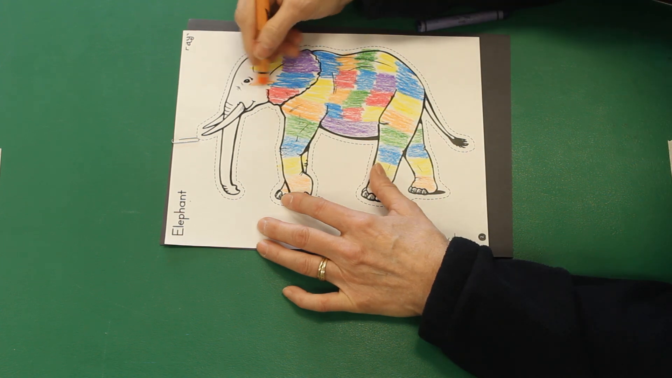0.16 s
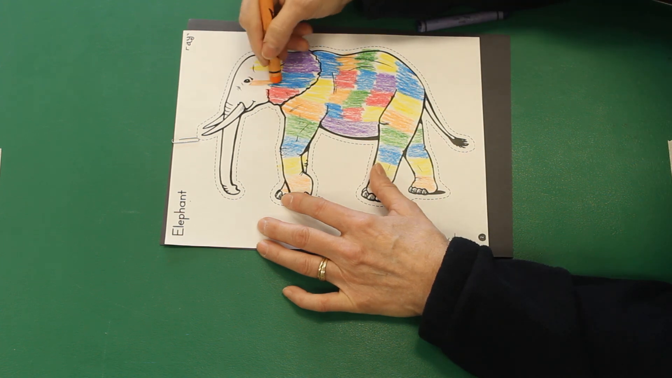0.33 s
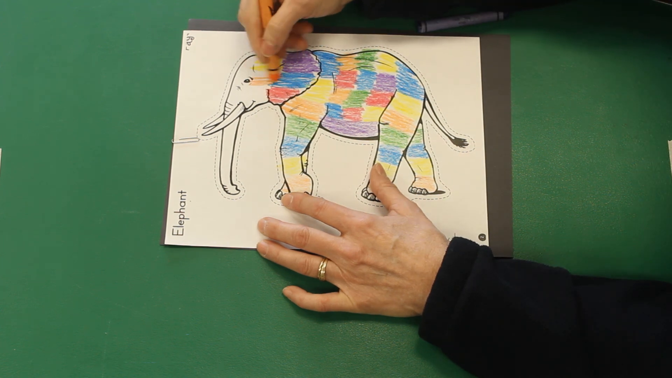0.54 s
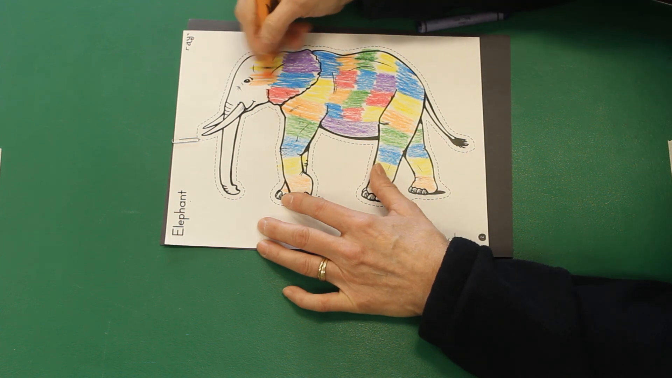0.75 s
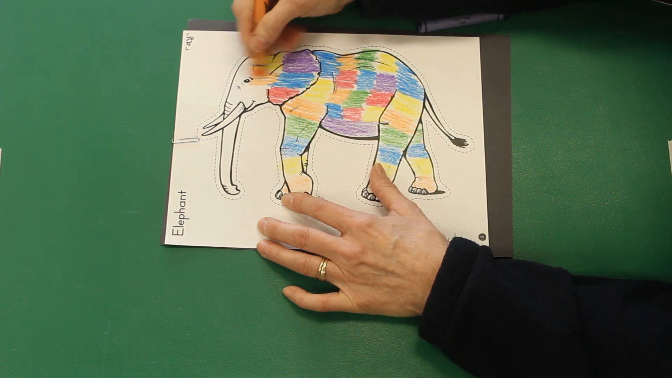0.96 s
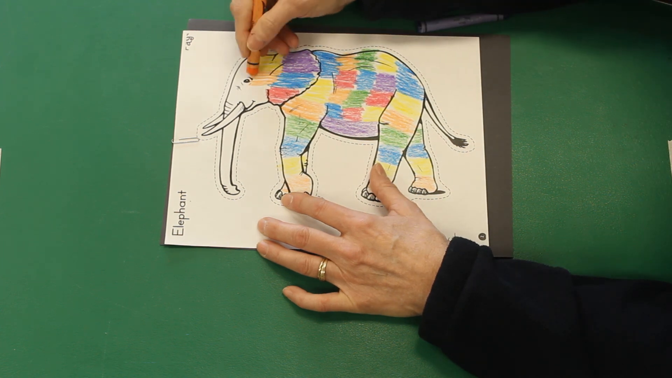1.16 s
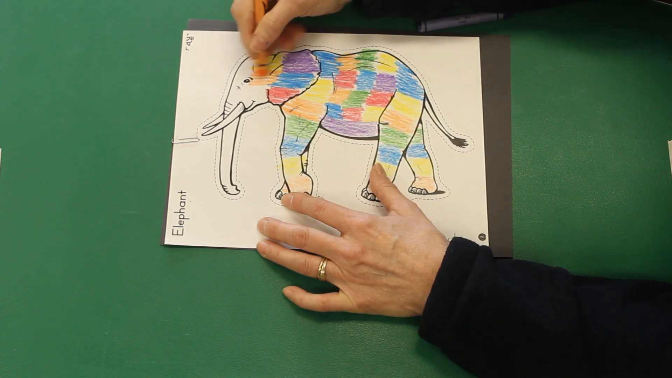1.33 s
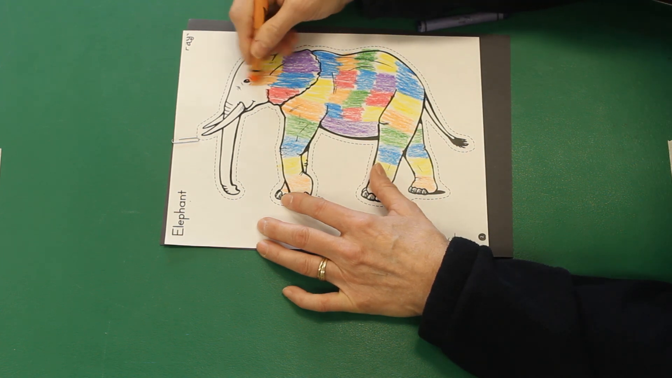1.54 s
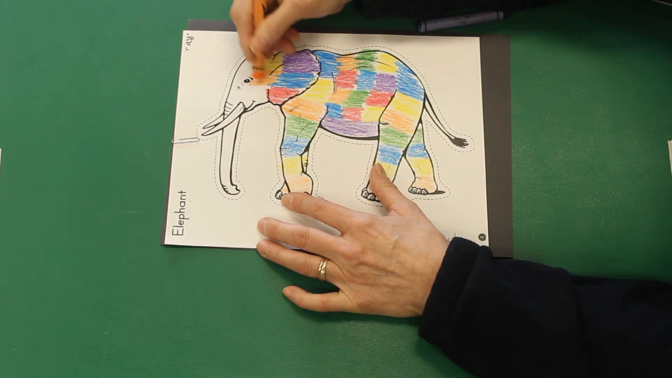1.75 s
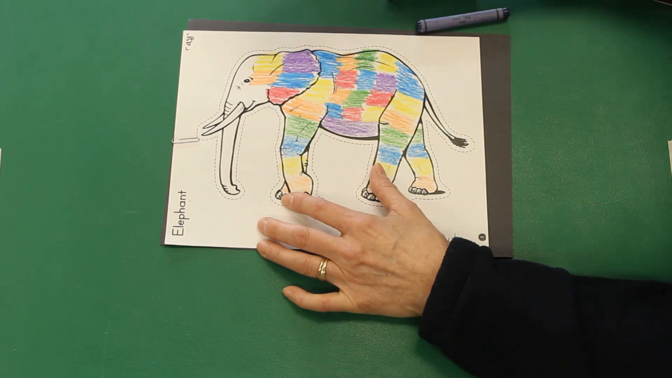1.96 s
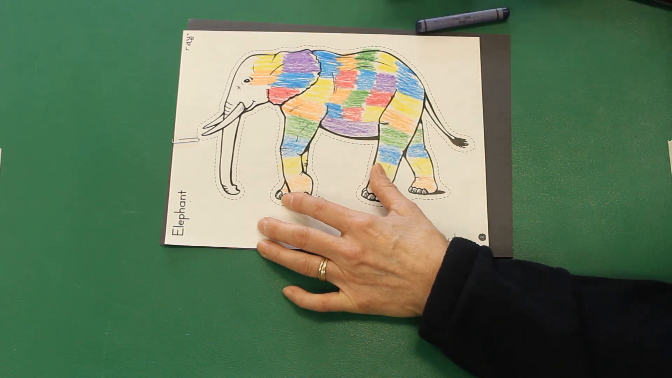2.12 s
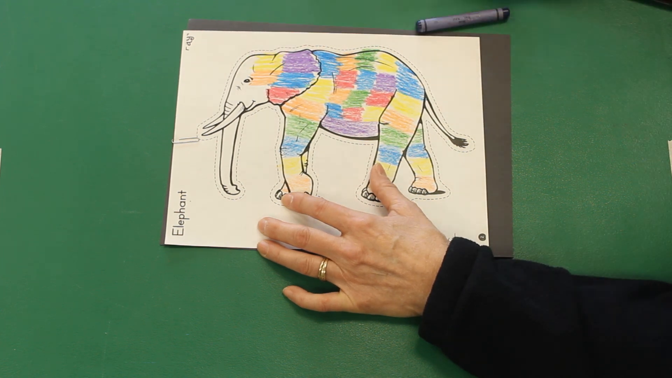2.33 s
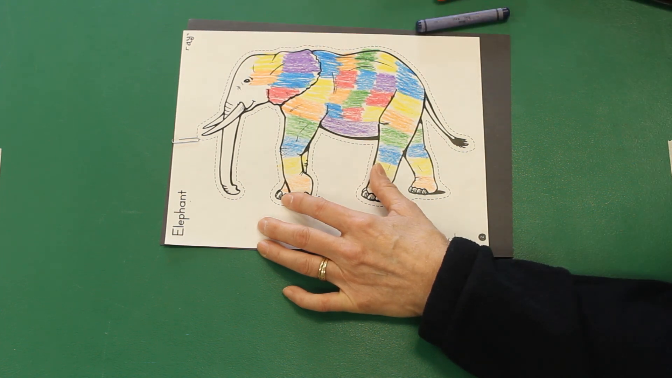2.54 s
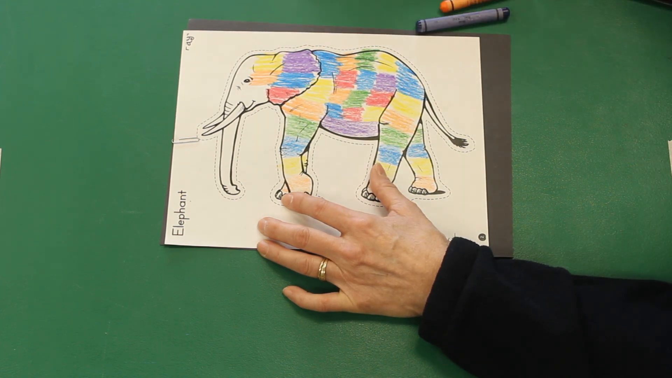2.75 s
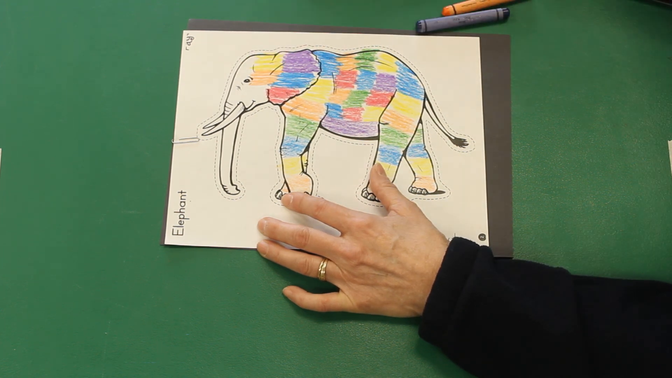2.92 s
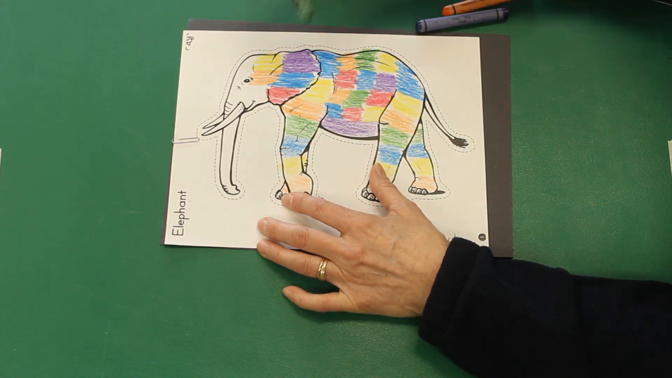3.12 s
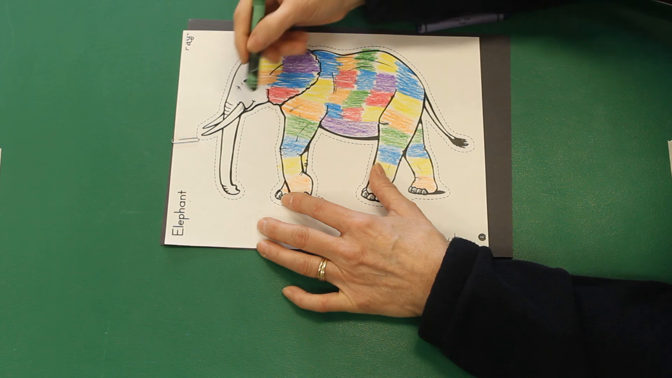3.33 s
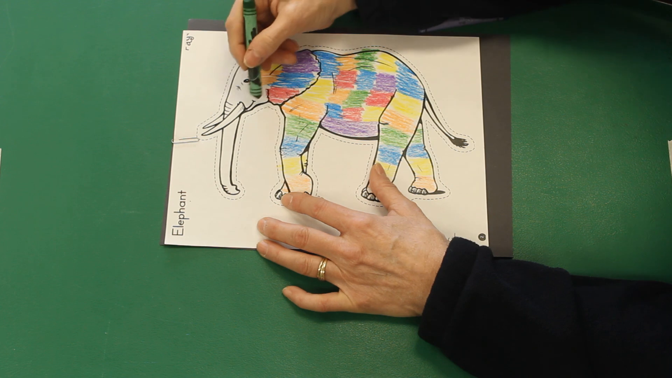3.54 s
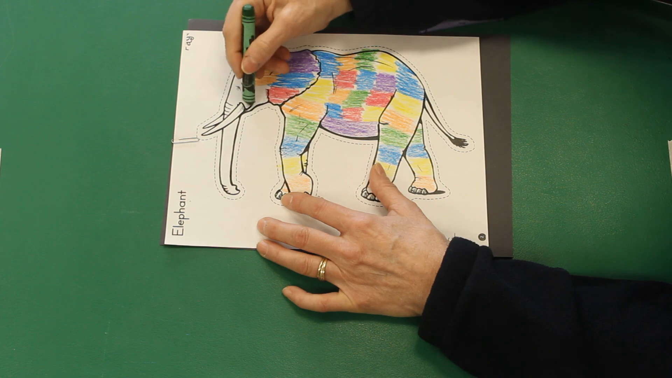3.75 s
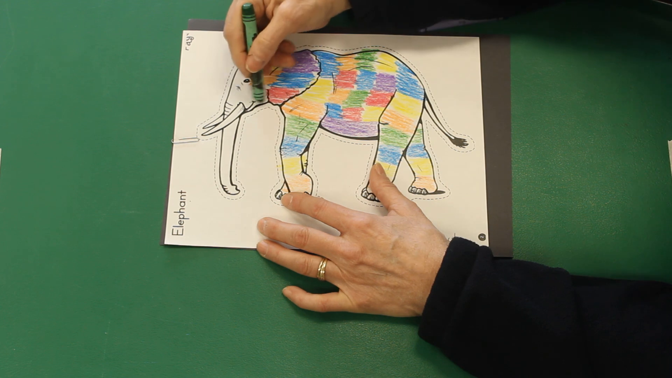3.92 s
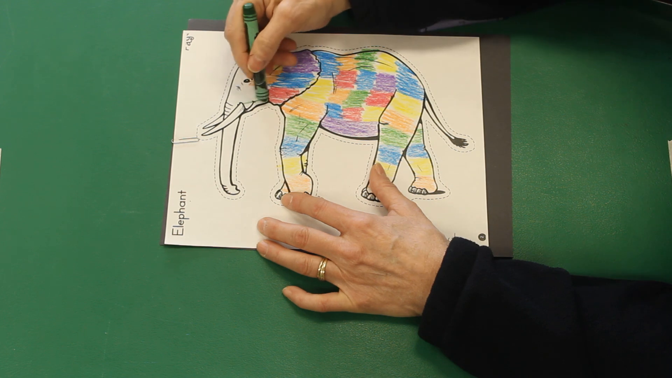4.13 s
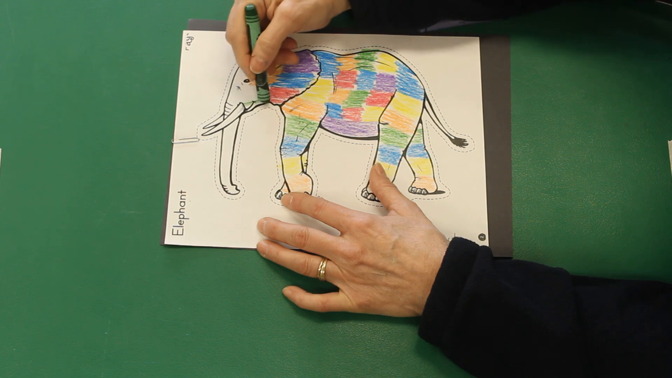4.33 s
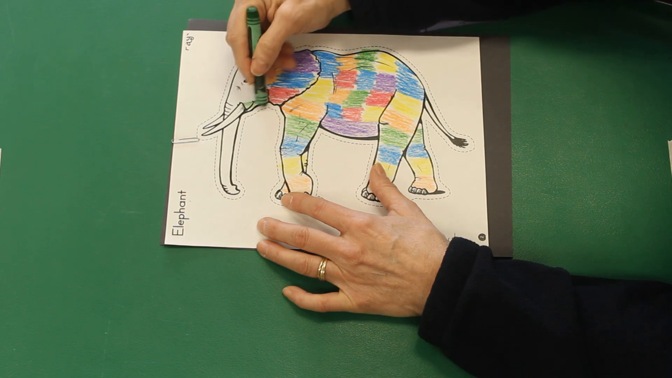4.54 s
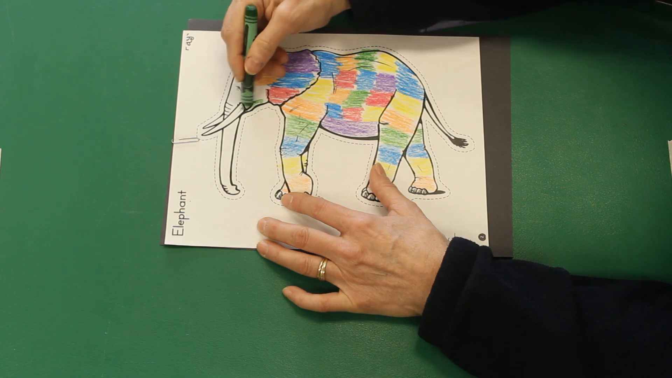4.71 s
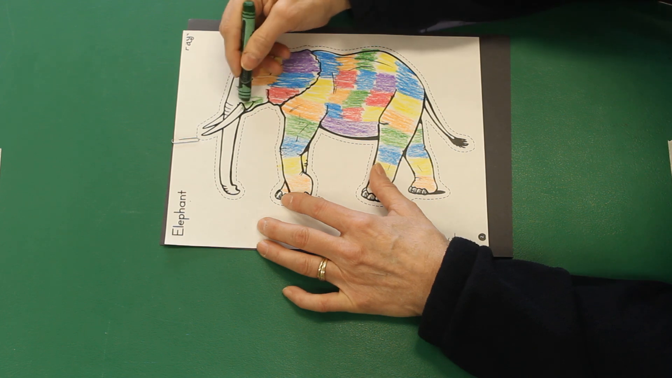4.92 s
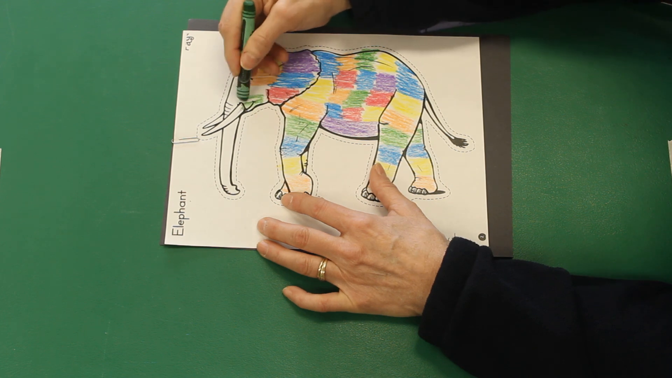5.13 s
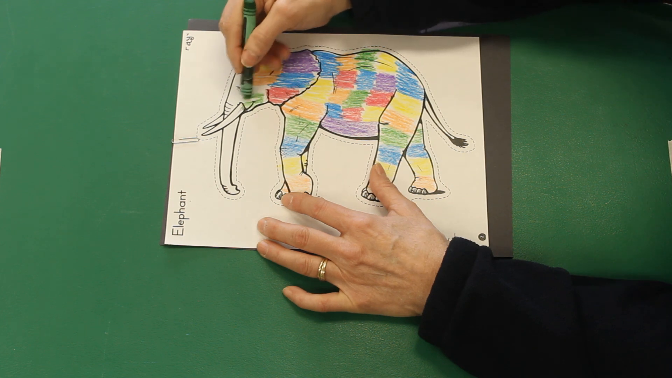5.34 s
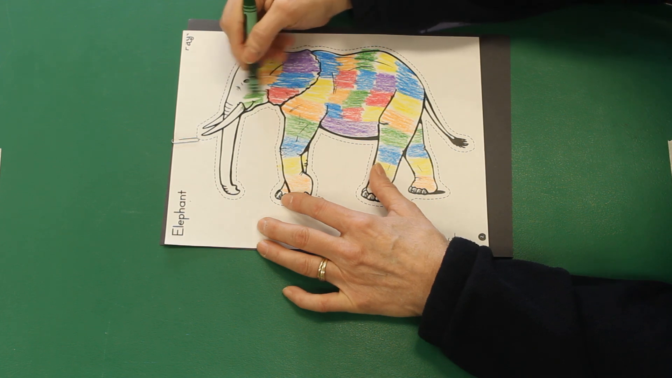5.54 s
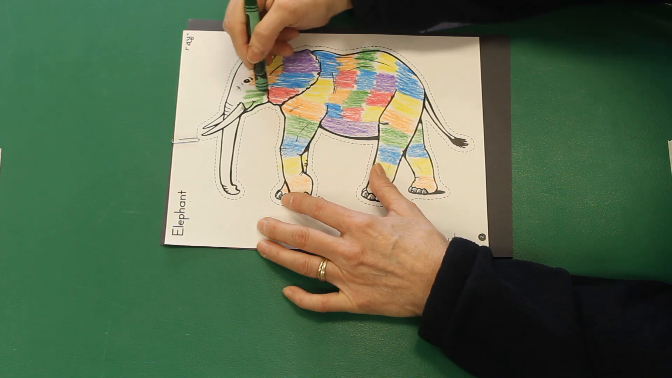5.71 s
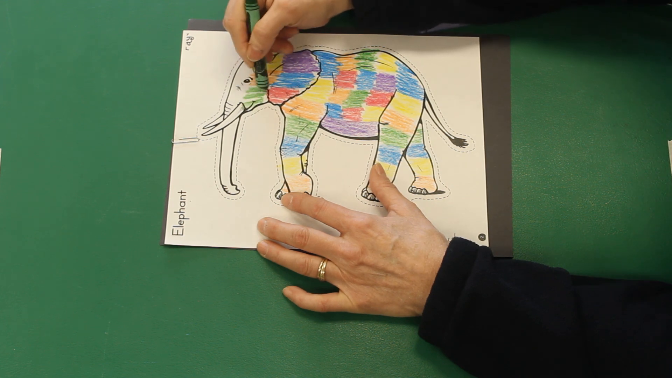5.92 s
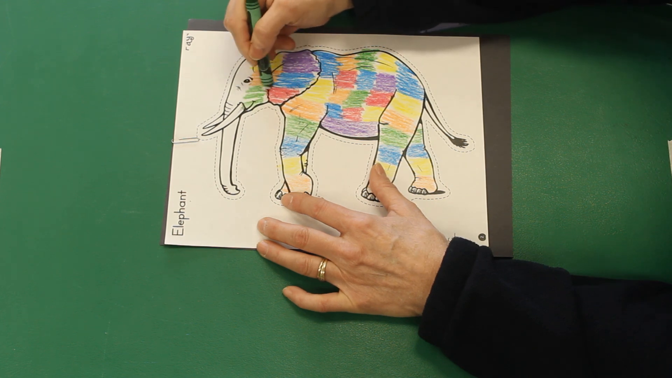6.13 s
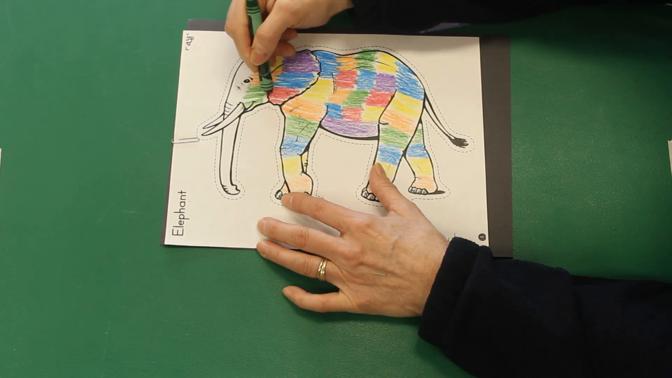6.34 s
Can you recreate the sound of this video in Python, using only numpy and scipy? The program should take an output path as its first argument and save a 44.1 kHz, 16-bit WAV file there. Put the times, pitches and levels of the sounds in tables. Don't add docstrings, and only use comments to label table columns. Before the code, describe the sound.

A close, quiet indoor recording at a hollow tabletop, with faint steady camera hiss throughout. From 0 to 1.8 s a wax crayon scribbles on paper in rapid back-and-forth strokes, roughly nine a second, uneven in pressure: a soft, dry, slightly raspy rub with a woody resonance, small stick-slip jolts and low hand bumps, the hardest near 0.6 s. Then a brief pause. At about 2.3 s the crayon is let go, with a knock at 2.38 and a much louder tight burst of hard clacks from 2.47 to 2.52, ringing briefly in the table. A weaker rattling roll at 2.75 to 2.9 dies away. Hiss and faint table movement fill the gap until 3.75 s, when a second crayon starts scribbling, duller and less raspy. A bright tiny wax snap ticks at 5.3 s. Strokes lighten after 5.7 s, with soft low bumps, continuing to the end at about 6.4 s.

```python
import sys
import numpy as np
from scipy import signal
from scipy.fft import rfft, irfft
from scipy.io import wavfile

SR = 44100
rng = np.random.default_rng(int(sys.argv[2]) if len(sys.argv) > 2 else 0)


def voltage_ratio(level):
    return 10 ** (np.asarray(level, float) / 20)


def digitize_waveform(pressure):
    field = np.atleast_2d(pressure).T
    bounded = np.clip(field, -1, 1)
    quanta = np.round(bounded * 32767).astype(np.int16)
    wavfile.write(sys.argv[1], SR, quanta)


N = 280917

# start t/s, length/s, pressure level/dB, wrist push level/dB
FIRST_STROKES = [(0.0, 0.087, -60, -60), (0.102, 0.096, -54, -60), (0.19, 0.12, -61.5, -60),
                 (0.338, 0.094, -53, -58), (0.415, 0.13, -59, -62), (0.56, 0.11, -57, -56),
                 (0.661, 0.115, -62.5, -57.5), (0.794, 0.083, -55, -55.5), (0.875, 0.13, -60, -58),
                 (1.025, 0.093, -52.5, -56), (1.115, 0.12, -64, -54.5), (1.261, 0.092, -60.5, -53),
                 (1.379, 0.1, -60.5, -57.5), (1.476, 0.076, -64.5, -60), (1.551, 0.11, -68, -64),
                 (1.664, 0.081, -58.5, -59), (1.757, 0.057, -73.5, -60)]
SECOND_STROKES = [(3.751, 0.037, -70, -71), (3.858, 0.07, -63.5, -59.5), (4.004, 0.073, -57.5, -62.5),
                  (4.083, 0.11, -60.5, -59.5), (4.24, 0.079, -55, -60), (4.323, 0.12, -59, -64.5),
                  (4.488, 0.061, -56.5, -63.5), (4.573, 0.084, -57, -63.5), (4.69, 0.085, -69.5, -62),
                  (4.785, 0.11, -65, -63), (4.916, 0.071, -60, -59.5), (4.997, 0.11, -62.5, -57),
                  (5.158, 0.048, -55.5, -56), (5.219, 0.11, -64, -59.5), (5.361, 0.099, -67, -58.5),
                  (5.456, 0.12, -61.5, -56.5), (5.568, 0.1, -60.5, -58.5), (5.688, 0.08, -67.5, -63),
                  (5.806, 0.067, -68, -66.5), (5.887, 0.1, -73.5, -66), (6.019, 0.06, -77, -66),
                  (6.089, 0.15, -74.5, -61.5), (6.218, 0.17, -62.5, -63.5)]
# place of top speed/0-1, surface level/dB, paper level/dB
STROKE_HABITS = [
    [(0.83, -68, -70.5), (0.23, -70, -71)],
    [(.55, -70, -86.5), (0.08, -69, -82)],
]
USUAL_PRESSURE_DB = -60
SURFACE_DB_PER_DB, PAPER_DB_PER_DB = 0.66, 0.03
# t/s, body peak level/dB, surface level/dB
TIP_JOLTS = [(0.349, -50, -58), (0.579, -39, -75), (0.811, -40, -78), (1.036, -37, -68), (3.764, -38, -80),
             (4.027, -53, -64), (4.527, -46.5, -64.5), (4.591, -53, -57), (5.172, -39, -71),
             (6.309, -43, -62.5), (2.321, -44.5, -66)]
# t/s, level/dB
RASP = [(0.0, -1.5), (0.7, 1.5), (1.05, 2.5), (1.3, -1), (1.5, 0.5), (1.8, -3), (4.3, 0), (5.3, 2),
        (6.37, 0)]
PUSH_TOPS = (0.39, 0.48)
PUSH_STRETCH, PUSH_LEAD_S = 1.41, 0.016
# start t/s, length/s, place of top/0-1, level/dB
SHOVES = [
    (1.868, 0.096, 0.43, -75),
    (2.315, 0.126, .55, -58.5),
    (2.469, 0.19, .28, -56.5),
    (2.732, 0.29, 0.31, -61),
    (3.272, 0.14, 0.66, -72),
    (3.591, .11, .4, -77),
]
# t/s, peak level/dB
BUMPS = [
    (0.613, -37.5),
    (0.838, -68),
    (1.071, -48),
    (1.297, -45),
    (5.048, -45.5),
    (5.271, -46),
    (5.508, -45),
    (6.12, -42.5),
]
# f/Hz, width/Hz, level/dB
ROCKING_MODES = [(43, 7, -7.5), (64.8, 23, -18.5), (91.5, 22, 3), (122, 55, -1.5), (159.3, 22, 1.5),
                 (182.4, 5, -1.5)]
BODY_MODES = [(227.6, 8.4, 0), (279.4, 22, -6.5), (385.2, 22.2, -3.5), (437, 34, -7.5), (509, 65, -13)]
SURFACE_MODES = [(638.5, 21, 7.5), (777, 32, 1), (860, 48, 0), (1003, 26, -1.5), (1065, 27, 4.5),
                 (1217, 50, 2.5), (1326, 38, -0.5), (1930, 740, -19.5)]
PAPER_MODES = [(2140, 500, 0), (3850, 370, 2.5), (4720, 650, 1), (6400, 2000, -7), (9300, 2800, -8.5)]
SNAP_MODES = [(4300, 1350, 0), (7300, 1300, -2.5), (8900, 1100, -5)]
# f/Hz, level/dB per Hz
HISS_MID = [(15, -49), (25, -17), (65, 5), (120, -4.5), (190, -3), (320, -8), (415, -9.5), (545, -9.5),
            (1100, -14), (3000, -17), (8000, -19.5), (14000, -19)]
HISS_SIDE = [(15, -35.5), (25, 2), (112, -8.5), (530, -9), (1500, -10.5), (8000, -10.5), (14000, -9.5)]
HISS_MID_DB, HISS_SIDE_DB, HISS_TOP_HZ = -68.5, -73, 14260
# t/s, peak level/dB
SNAPS = [
    (0.1365, -45),
    (0.9794, -57),
    (1.5489, -51),
    (4.81, -51),
    (5.2604, -55),
    (5.2899, -33.5),
    (5.3044, -52.5),
    (5.4784, -51),
]
# t/s, peak level/dB, crack level/dB, tick level/dB, share of ring time
KNOCKS = [(2.321, -52.5, -74, -75.5, 1.1), (2.376, -19, -36, -53, 1.24), (2.467, -11.5, -28, -30.5, 0.86),
          (2.479, -10, -22, -18.5, 1.41), (2.487, -29, -42, -53, 1), (2.492, -22, -36.5, -39, 0.61),
          (2.5, -27, -50, -38, 0.92), (2.516, -19.5, -37.5, -50, 1.55), (2.747, -30.5, -51, -85, 0.97),
          (2.797, -31, -48.5, -51, 1.8), (2.827, -30.5, -46.5, -66, 0.84), (2.832, -37.5, -58, -80, 1.1),
          (2.839, -38.5, -65, -60, 0.76), (2.868, -44.5, -73, -70, 1.1), (2.895, -51, -79, -73, 2.1),
          (2.978, -64, -84, -77, 1.7)]
# f/Hz, level/dB, t60/s
RING_MODES = [(172.3, -9, 0.25), (225.7, -13.5, 0.2), (412.3, -1.5, 0.24), (434, -7.5, 0.17),
              (514.5, 6, 0.12), (631, -5, 0.2), (770, -8.5, .2), (810, -5, 0.16), (963, -6.5, 0.14),
              (1008, -5, .16), (1163, 6.5, 0.13), (1290, -6.5, 0.19), (1438, -9, 0.099), (1745, 0.5, 0.13),
              (2790, -4, .15), (3270, -16, 0.206), (3480, -10.5, 0.19), (3870, -9, 0.14)]
# f/Hz, level/dB per Hz
CLATTER = [(90, -35), (175, -5), (260, -17), (340, -13), (500, -1), (1100, 0.5), (1900, -9.5), (2600, -10),
           (3600, -11.5), (4900, -32), (6500, -21.5), (8500, -39), (16000, -40.5)]
# f/Hz, t60/s
CLATTER_T60 = [(150, 0.32), (300, .25), (700, 0.2), (1800, 0.19), (3500, 0.31), (6000, 0.19), (9000, .1),
               (14000, 0.054)]
THUD_DB, THUD_DB_PER_DB = -26, 0.76


def unit(x):
    return x / np.sqrt(np.mean(x ** 2))


def on_log(hz, table):
    f, v = np.transpose(table)
    return np.interp(np.log(np.maximum(hz, 1)), np.log(f), v)


def colour(x, table):
    hz = np.fft.rfftfreq(len(x), 1 / SR)
    return irfft(rfft(x) * voltage_ratio(on_log(hz, table)), len(x))


def resonate(x, modes):
    hz = np.fft.rfftfreq(len(x), 1 / SR) + 1e-9
    gain = 0
    for k, (f, width_hz, db) in enumerate(modes):
        gain = gain + (-1) ** k * voltage_ratio(db) / (1 + 1j * (hz / f - f / hz) * f / width_hz)
    return irfft(rfft(x) * gain, len(x))


def band(x, lo_hz, hi_hz):
    return signal.sosfilt(signal.butter(3, [lo_hz, hi_hz], "band", fs=SR, output="sos"), x)


def clicks(events, column, db):
    out = np.zeros(N)
    for row in events:
        out[int(row[0] * SR)] = voltage_ratio(row[column] + db)
    return out


def humps(rows, sharp):
    out = np.zeros(N)
    for start_s, length_s, top, db in rows:
        start, n = int(start_s * SR), int(length_s * SR)
        top = np.clip(top, 0.04, 0.92)
        u = np.arange(n) / n
        ramp = np.where(u < top, u / top, (1 - u) / (1 - top))
        hump = np.sin(np.pi / 2 * ramp) ** sharp
        out[max(start, 0):start + n] += voltage_ratio(db) * hump[max(-start, 0):N - start]
    return out


def slips(rate_hz, spread_db):
    slip, sign, size = rng.random((3, N))
    return unit((slip < rate_hz / SR) * (sign - 0.5) * voltage_ratio(-spread_db * np.log(1 - size)))


def speed(column, sharp):
    rows = []
    for strokes, habits in zip((FIRST_STROKES, SECOND_STROKES), STROKE_HABITS):
        for k, (start_s, length_s, db, _) in enumerate(strokes):
            top, surface_db, paper_db = habits[k % 2]
            extra_db = db - USUAL_PRESSURE_DB
            surface_db += SURFACE_DB_PER_DB * extra_db
            paper_db += PAPER_DB_PER_DB * extra_db
            rows.append((start_s, length_s, top, (db, surface_db, paper_db)[column]))
    return humps(rows, sharp)


def rubbed(force, column, sharp, modes, db):
    steady_rms = np.sqrt(np.mean(resonate(force, modes) ** 2))
    return voltage_ratio(db) * resonate(force * speed(column, sharp), modes) / steady_rms


def crayon():
    coarse = slips(rate_hz=450, spread_db=2.5) + 0.42 * rng.standard_normal(N)
    fine = slips(rate_hz=5000, spread_db=1.5)
    body = rubbed(coarse, column=0, sharp=1.36, modes=BODY_MODES, db=0.36)
    body += resonate(clicks(TIP_JOLTS, column=1, db=35.5), BODY_MODES)
    surface = rubbed(coarse, column=1, sharp=1.1, modes=SURFACE_MODES, db=-1.5)
    surface += resonate(clicks(TIP_JOLTS, column=2, db=39), SURFACE_MODES)
    paper = rubbed(fine, column=2, sharp=0.69, modes=PAPER_MODES, db=0.5)
    rasp_db = np.interp(np.arange(N) / SR, *np.transpose(RASP))
    return band(body + surface + paper * voltage_ratio(rasp_db), 60, 12500)


def hand():
    moves = list(SHOVES)
    for strokes in (FIRST_STROKES, SECOND_STROKES):
        for k, (start_s, length_s, _, db) in enumerate(strokes):
            moves.append((start_s - PUSH_LEAD_S, length_s * PUSH_STRETCH, PUSH_TOPS[k % 2], db))
    tremble = unit(resonate(slips(rate_hz=1800, spread_db=-0.8), ROCKING_MODES))
    pushes = voltage_ratio(-0.3) * humps(moves, sharp=1.4) * tremble
    bumps = resonate(clicks(BUMPS, column=1, db=44), ROCKING_MODES)
    return band(pushes + bumps, 29, 260)


def hiss(table, db):
    edge = [(HISS_TOP_HZ, table[-1][1]), (HISS_TOP_HZ + 10, -99)]
    return voltage_ratio(db) * unit(colour(rng.standard_normal(N), list(table) + edge))


def snaps():
    push = np.roll(clicks(SNAPS, column=1, db=16.5), int(0.00034 * SR))
    out = np.zeros(N)
    for mode in SNAP_MODES:
        tick = push
        for _ in range(3):
            tick = resonate(tick, [mode])
        out += tick
    return out


def knock(ring):
    t = np.arange(SR // 2) / SR
    hz = np.fft.rfftfreq(len(t), 1 / SR)
    noise = rfft(colour(rng.standard_normal(len(t)), CLATTER))
    clatter = 0
    for f in 125 * 2 ** np.arange(0, 7.5, 0.5):
        part = irfft(noise * np.clip(1 - 2 * np.abs(np.log2((hz + 1) / f)), 0, 1), len(t))
        direct = 2.8 * (f / 1000) ** 0.5 * np.exp(-t / (0.0099 * (1000 / f) ** 0.63))
        tail = voltage_ratio(-60 * t / (ring * on_log(f, CLATTER_T60)))
        clatter = clatter + part * (tail + direct)
    modes = 0
    for f, db, t60_s in RING_MODES:
        vary_db, detune = rng.standard_normal(2) * [3, 0.003]
        decay = voltage_ratio(db + vary_db - 60 * t / (ring * t60_s))
        modes = modes + decay * np.sin(2 * np.pi * f * (1 + detune) * t)
    modes = modes * (1 + 0.57 * np.exp(-t / 0.005))
    contact = -np.exp(-((t - 0.00025) / 0.000097) ** 2)
    return unit(clatter) + 0.56 * unit(modes) + 38 * contact


def knocks():
    out = np.zeros(N + SR)
    for t_s, db, crack_db, tick_db, ring in KNOCKS:
        blow = knock(np.clip(ring, 0.2, 2))
        parts = [(db - 3, 400, 2000),
                 (THUD_DB + THUD_DB_PER_DB * db + 6.5, 110, 450),
                 (crack_db + 12.5, 1600, 4900),
                 (tick_db + 1, 4500, 16000)]
        start = int(t_s * SR)
        for peak_db, lo_hz, hi_hz in parts:
            part = band(blow, lo_hz, hi_hz)
            out[start:start + len(blow)] += voltage_ratio(peak_db) * part / np.abs(part).max()
    return out[:N]


def scene():
    near = crayon() + hand() + snaps() + knocks()
    return np.array([near, near])


def roll_off(x):
    return signal.sosfilt(signal.butter(12, 16540, fs=SR, output="sos"), x)


def record(dry):
    heard = signal.sosfilt(signal.butter(8, 14900, fs=SR, output="sos"), dry)
    mid = hiss(HISS_MID, HISS_MID_DB)
    side = hiss(HISS_SIDE, HISS_SIDE_DB)
    return roll_off(heard + np.array([mid + side, mid - side]))


dry = scene()
out = record(dry)
digitize_waveform(out)
```